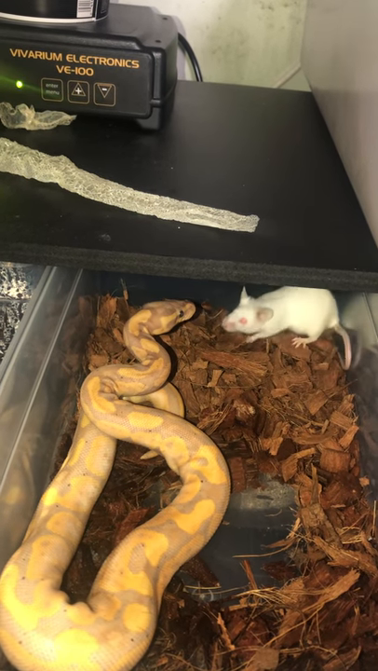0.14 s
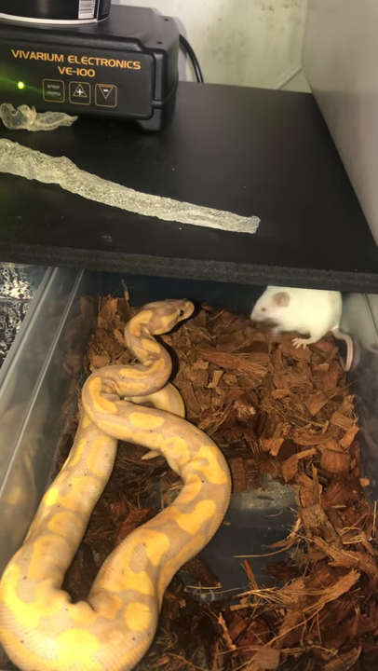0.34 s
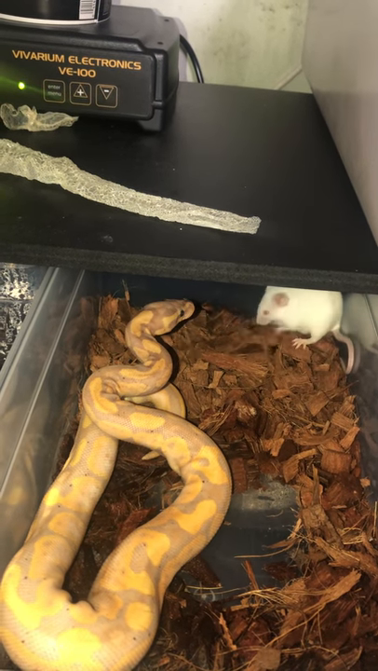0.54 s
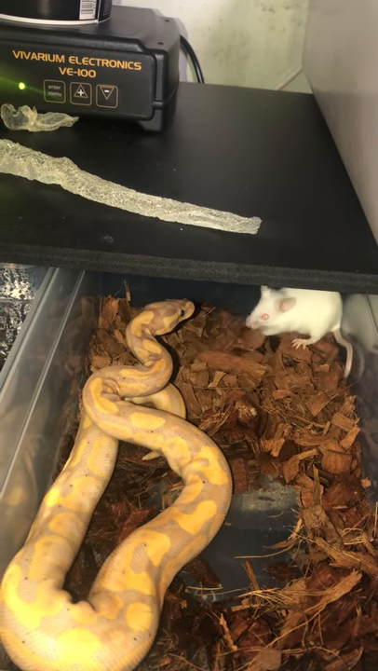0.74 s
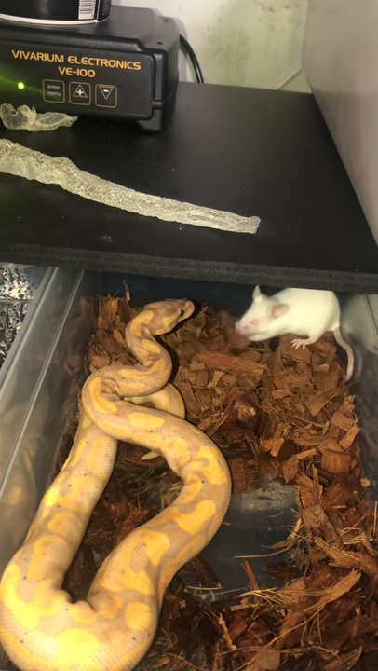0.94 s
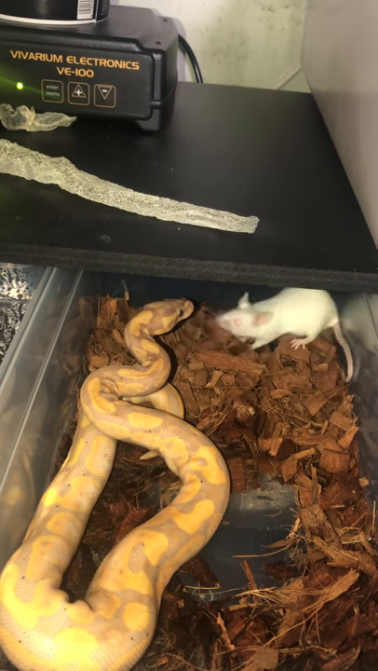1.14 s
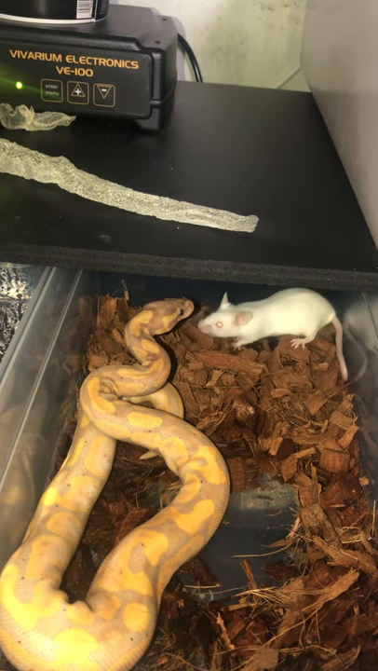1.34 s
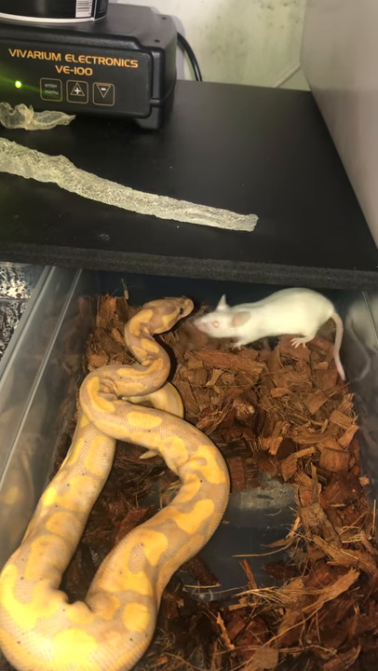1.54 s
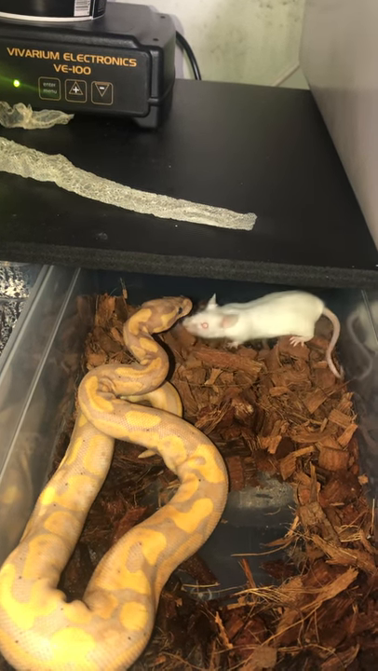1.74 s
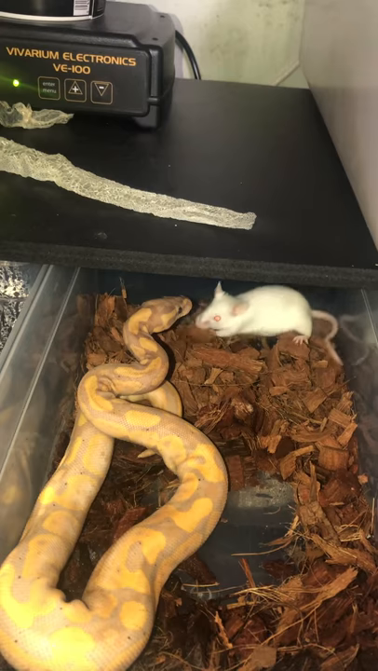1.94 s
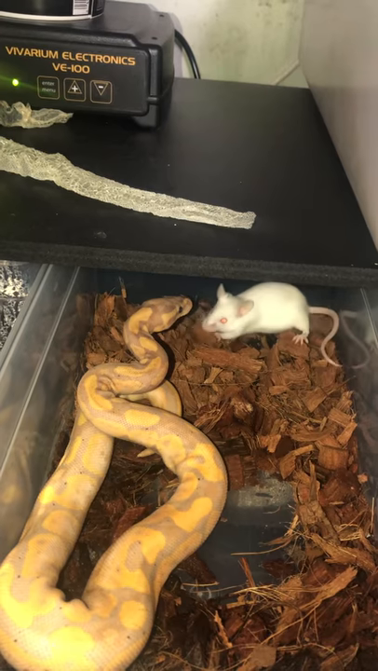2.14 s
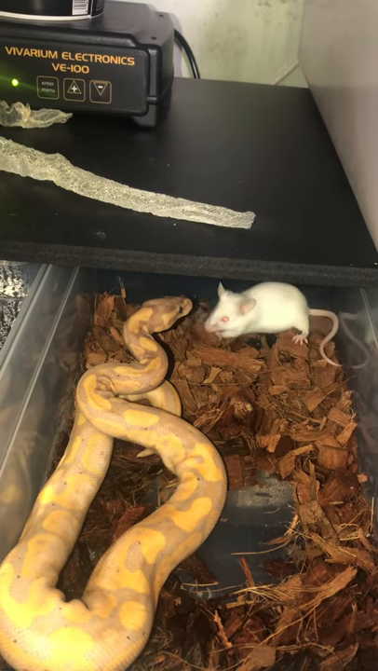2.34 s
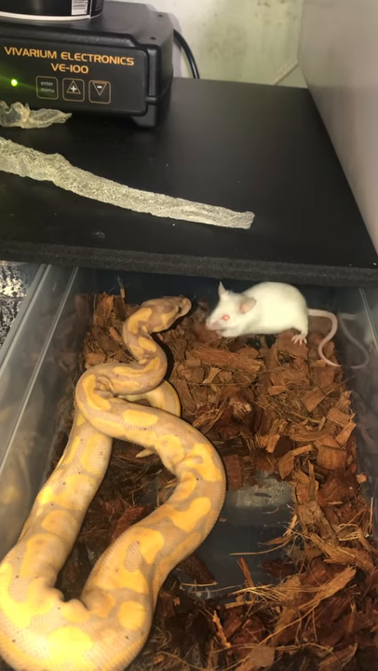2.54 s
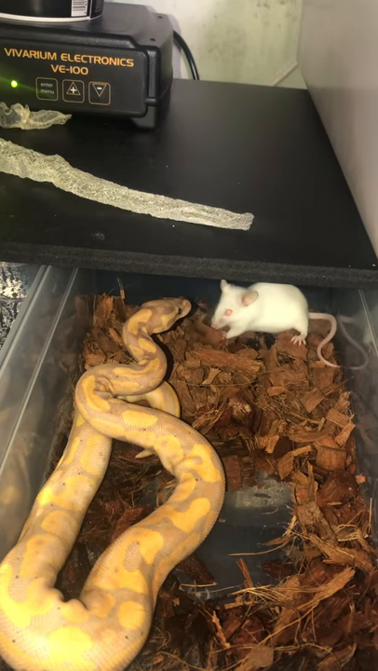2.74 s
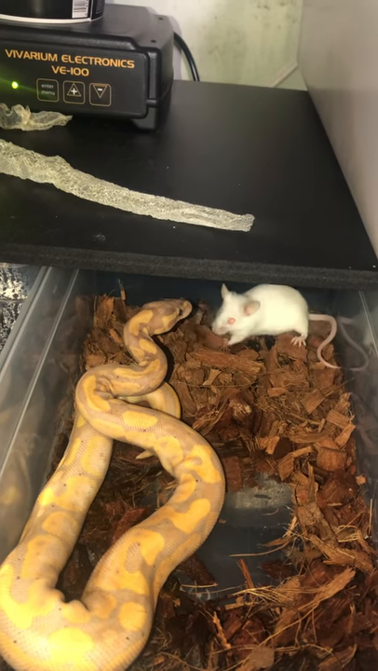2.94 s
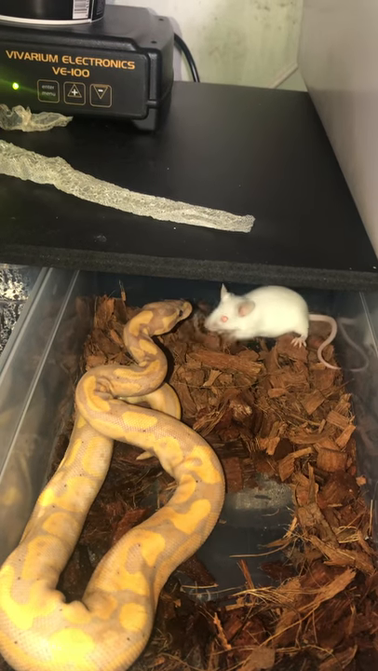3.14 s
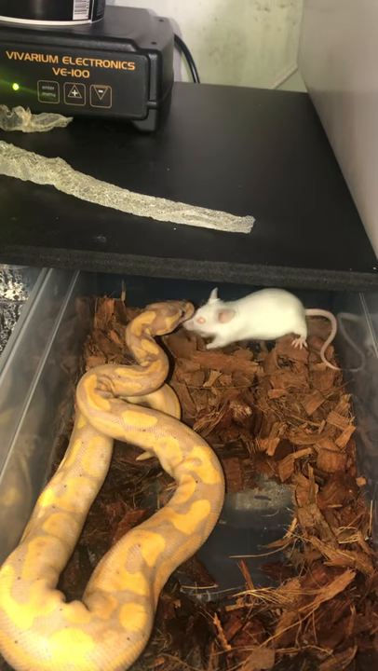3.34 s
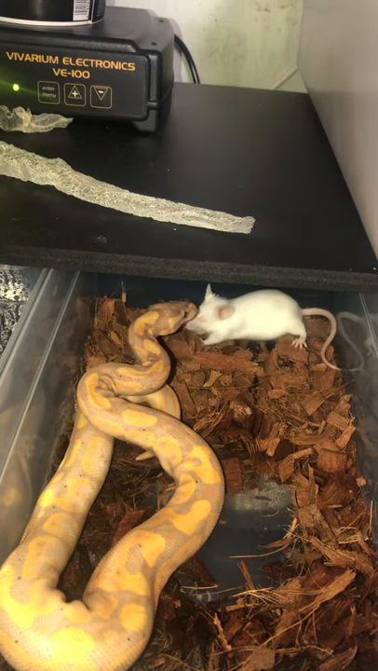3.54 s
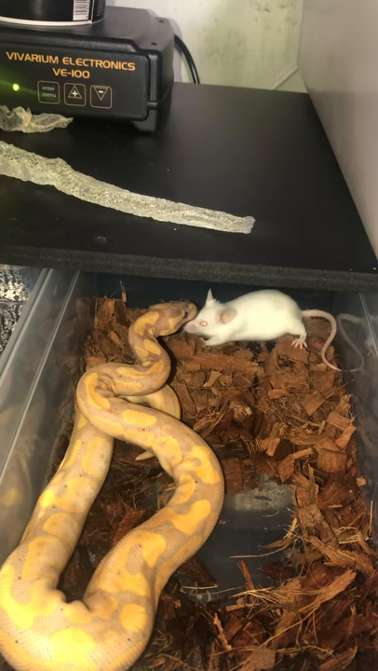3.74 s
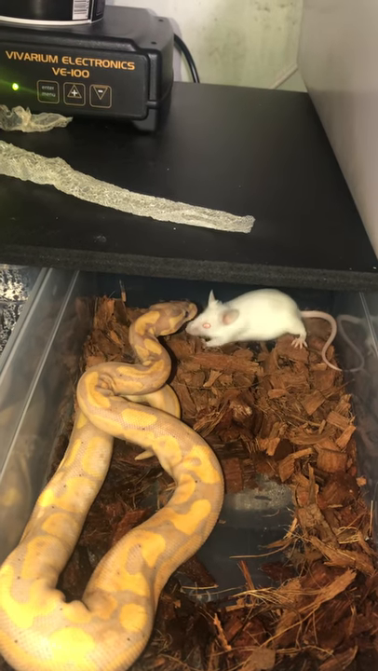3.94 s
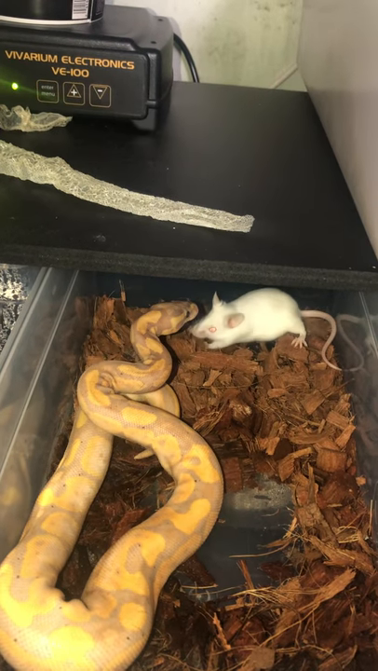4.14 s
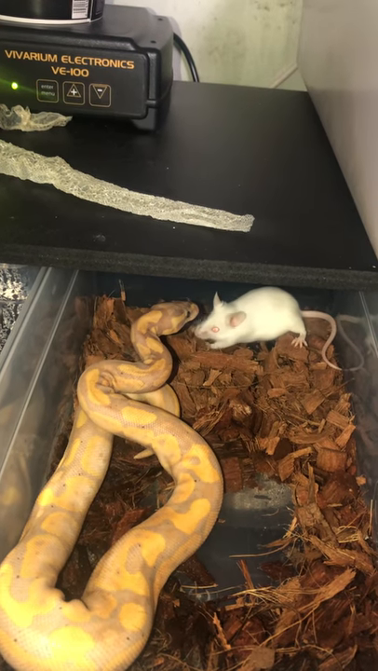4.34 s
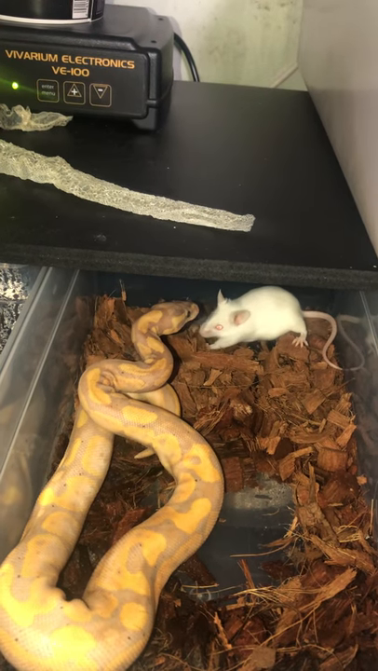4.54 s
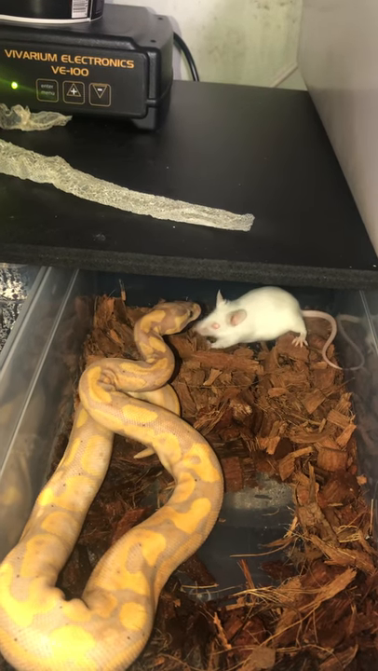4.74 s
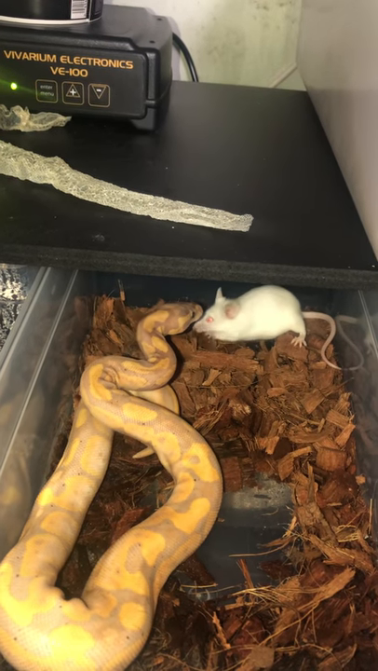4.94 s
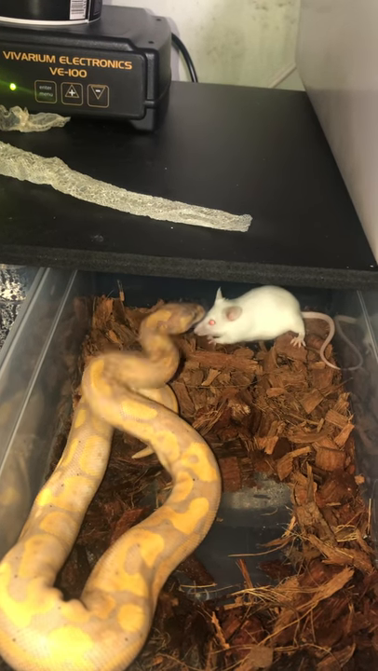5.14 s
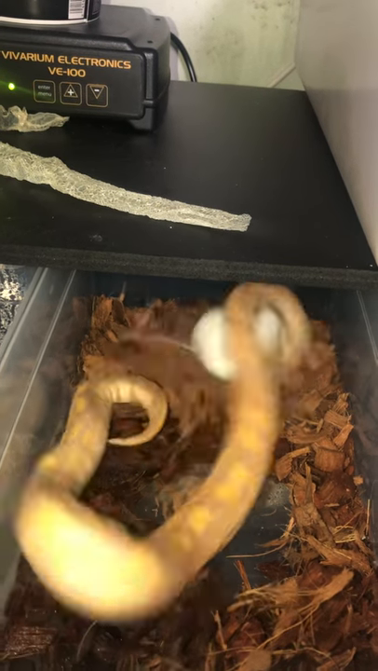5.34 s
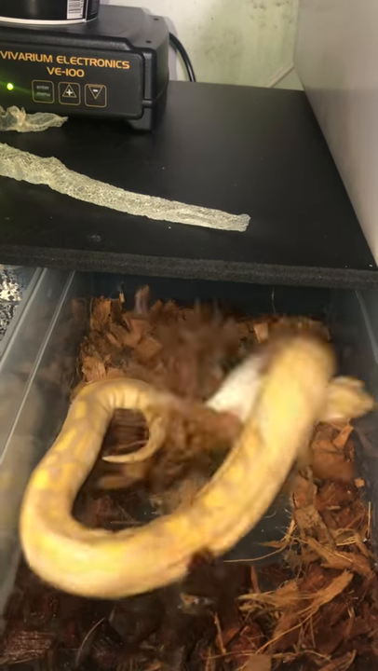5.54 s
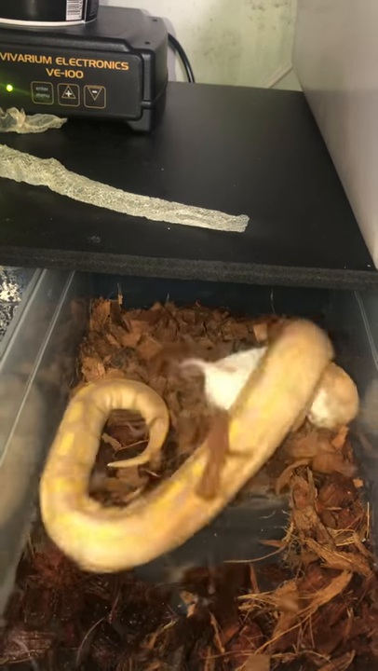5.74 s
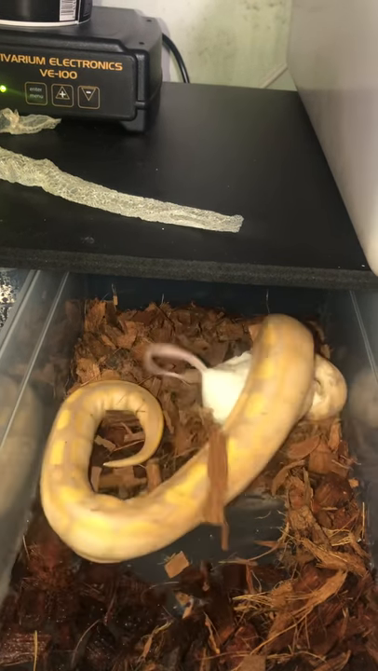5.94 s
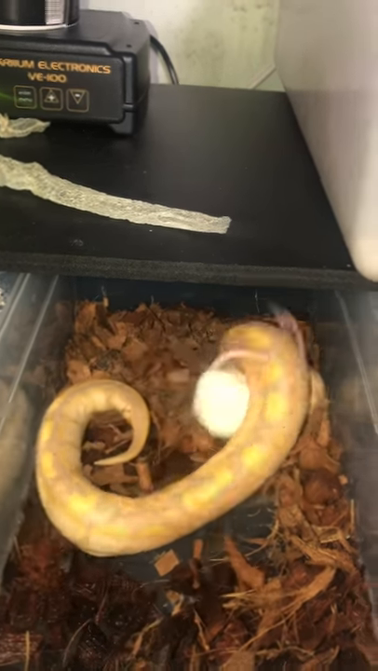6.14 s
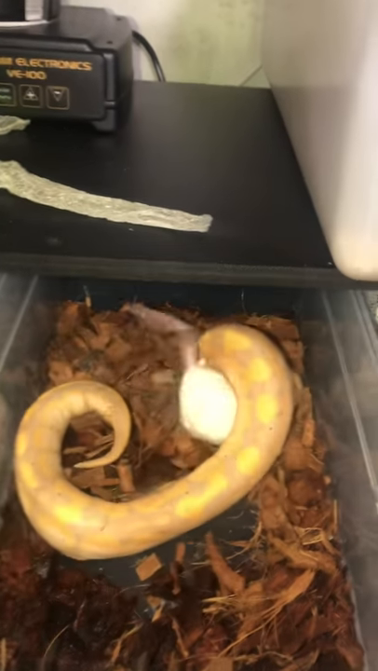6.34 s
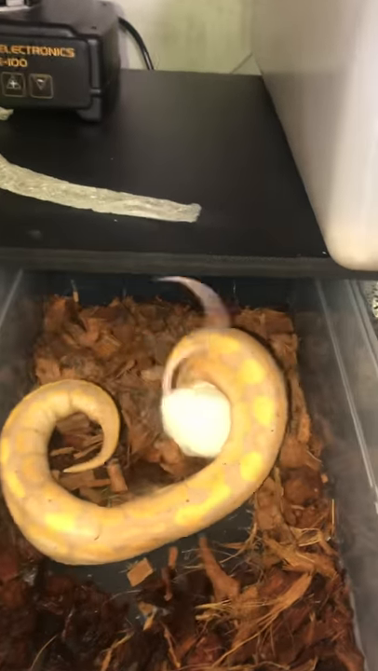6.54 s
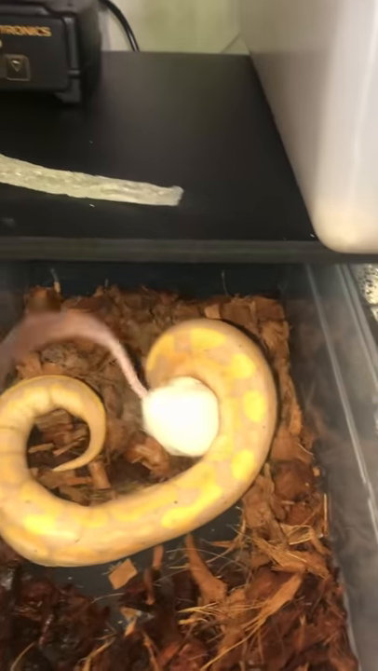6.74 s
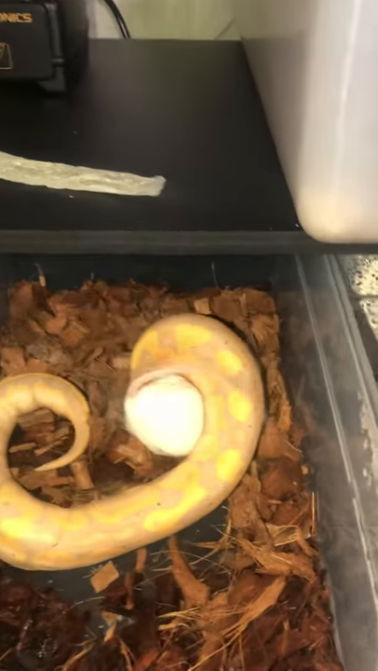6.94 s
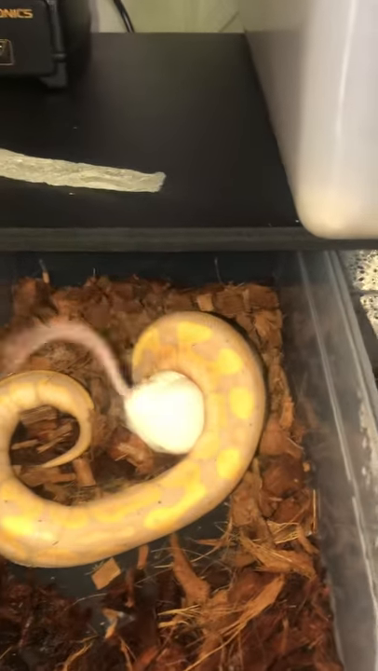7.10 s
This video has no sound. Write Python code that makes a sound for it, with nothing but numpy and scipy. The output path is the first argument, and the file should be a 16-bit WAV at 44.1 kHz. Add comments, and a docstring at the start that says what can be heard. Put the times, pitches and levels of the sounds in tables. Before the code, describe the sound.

Soft, grainy rustling of paws in dry bark chips, with tiny ticks, barely audible rubbing squeaks and a couple of sharp snaps, heard by one nearby microphone in a small quiet room. After a near pause, a snake's strike knocks the plastic tub with rapid low thuds and loud crackling. Coils then slide through the chips, swish along the wall and quieten.

```python
"""Dry bark chips rustle in a plastic tub: a mouse scratches about, then a snake strikes, thumps the tub
and drags its coils through them. Rustle is grainy noise, split into scrape, crisp husks and low drag.
Snaps are short noise bursts, thumps are down-swept sines, squeaks and a swish are resonant noise.
The walls answer with a short noise tail; a quiet room rumbles and hisses behind; one microphone."""
import sys
import numpy as np
from scipy import signal
from scipy.fft import rfft, irfft, next_fast_len
from scipy.io import wavfile
from scipy.ndimage import uniform_filter1d, map_coordinates

SR = 44100
rng = np.random.default_rng(int(sys.argv[2]) if len(sys.argv) > 2 else 0)


def generate_wav(signal):
    """Clip the signal to [-1, 1] and save it as 16-bit WAV at the path in sys.argv[1]."""
    frames = np.transpose(np.atleast_2d(signal))
    scaled = np.clip(frames, -1, 1) * 32767
    pcm = np.round(scaled).astype(np.int16)
    wavfile.write(sys.argv[1], SR, pcm)


N = 316175
T = np.arange(N) / SR  # time of each sample [s]


def amp(db):
    """Decibels to an amplitude factor."""
    return 10 ** (np.asarray(db) / 20)


def unit(x):
    """Scale to an rms of 1."""
    return x / np.sqrt(np.mean(x ** 2) + 1e-20)


def noise():
    """White noise as long as the scene."""
    return rng.standard_normal(N)


def along(points, hz):
    """Read a curve of (frequency [Hz], value) points on a log frequency axis."""
    f, v = np.transpose(points)
    return np.interp(np.log(hz + 1), np.log(f + 1), v)


def wobble(rate):
    """A smooth random curve, rate knots a second."""
    knots = rng.standard_normal(int(N * rate / SR) + 4)
    return map_coordinates(knots, [T * rate])


def filtered(x, response):
    """Filter x with a complex response of frequency."""
    m = next_fast_len(x.shape[-1] + 8192)
    spectrum = rfft(x, m) * response(np.fft.rfftfreq(m, 1 / SR))
    return irfft(spectrum, m)[..., :x.shape[-1]]


def resonance(f, hz, width):
    """One damped mode: passes its pitch at full level and falls off on both sides."""
    return 1j * f * width / (hz * hz - f * f + 1j * f * width)


# spectrum of the room tone: (frequency [Hz], relative density [dB per Hz])
ROOM = [(38, -33), (65, 1), (113, 0.5), (242, -15), (349, -14), (1130, -40), (1880, -32.5), (2310, -51.5),
        (2910, -41), (8790, -46.5), (12700, -68), (16000, -38)]
# wavering low hum: (frequency [Hz], width of one filter pass [Hz], starting level [dB], drift [dB per s])
HUM = [(41.1, 1.7, -54, -4), (54.9, 7.5, -56.5, -0.07)]
ROOM_DB = -57.5


def room():
    """Steady rumble and hiss as shaped noise, plus narrow noise bands that waver as low hum."""
    air = unit(filtered(noise(), lambda f: amp(along(ROOM, f))))
    out = amp(ROOM_DB) * air
    for hz, width, db, drift_db in HUM:
        band = filtered(noise(), lambda f: resonance(f, hz, width) ** 2)
        out = out + amp(db + drift_db * T) * unit(band)
    return out


# resonances of the tub: (frequency [Hz], width [Hz], level before the shared lift [dB])
TUB = [(1308, 146, -7), (1889, 107, -2.5), (2560, 44, -7), (2939, 76, -3.5), (3500, 80, -10),
       (4470, 40, -21), (6020, 73, -8)]
TUB_LIFT_DB = 3.5


def tub(f):
    """The open tub passes everything and lifts its own resonances."""
    modes = sum(amp(db) * resonance(f, hz, width) for hz, width, db in TUB)
    return 1 + amp(TUB_LIFT_DB) * modes


PATCH_DB = 1.8  # how far the colour of the crackle shifts in passing patches


def crackle(spectrum, rate, spread_db, grain_s, bed_db, lumps_db):
    """Short noise grains of scattered size over a bed of friction noise, coloured by the tub, rms 1."""
    hits = rng.random(N) < rate / SR  # rate is the mean number of grains a second
    sizes = hits * amp(spread_db * np.minimum(rng.exponential(size=N), 2))
    fade = np.exp(-np.arange(400) / (SR * grain_s))
    envelope = unit(signal.fftconvolve(sizes, fade)[:N]) + amp(bed_db)
    raw = envelope * amp(lumps_db * wobble(45)) * noise()
    # smooth random tilts over time and frequency keep the colour moving
    z = signal.stft(raw, nperseg=256)[2]
    across_pitch = uniform_filter1d(rng.standard_normal(z.shape), size=5, axis=0)
    patches = unit(uniform_filter1d(across_pitch, size=9, axis=1))
    raw = signal.istft(z * amp(PATCH_DB * patches), nperseg=256)[1][:N]
    return unit(filtered(raw, lambda f: amp(along(spectrum, f)) * tub(f)))


def stroke(s, length):
    """A swell from silence to 1 and back: starts 0.41 length before s and lasts 1.7 length in all."""
    u = np.clip((T - s) / length * 0.59 + 0.24, 0, 1)
    return np.sin(np.pi * u) ** 1.96


# steady settling and sliding of the chips: (time [s], scrape level [dB])
STIR = [(0, -81), (.6, -71.5), (2.1, -74.5), (3.4, -76), (4.6, -78.5), (5.22, -74.5), (5.28, -48),
        (5.58, -50), (5.74, -58), (5.95, -56), (6.2, -60.5), (6.43, -50.5), (6.58, -60.5), (6.8, -68.5),
        (7.17, -73)]
# single strokes of paws and coils through the chips:
# (time [s], nominal length [s], scrape level [dB], crisp husks re scrape [dB])
SCUFFS = [(0.041, 0.046, -62.5, -4.5), (0.274, 0.069, -66.5, -23), (0.404, 0.068, -62, -10),
          (0.513, 0.034, -65, -0.5), (0.598, .055, -61, -5), (0.676, .074, -55, -5),
          (0.803, 0.068, -66.5, 1.5), (0.977, 0.065, -62, 3.5), (1.154, 0.11, -66.5, 2),
          (1.223, 0.016, -65, 12.5), (1.259, 0.029, -63.5, 1.5), (1.355, 0.072, -67, 2),
          (1.582, 0.056, -64.5, 0.5), (1.716, 0.033, -67.5, 0), (1.786, 0.12, -78.5, 9.5),
          (1.914, 0.15, -61, -9), (2.27, 0.025, -65.5, 3), (2.314, .018, -74.5, 8), (2.438, 0.12, -73, 4),
          (2.637, 0.2, -81, 10), (2.848, 0.033, -70.5, -6), (2.95, 0.073, -73, 6), (3.198, 0.04, -72.5, 7),
          (3.261, 0.047, -60, 0.5), (3.311, 0.068, -64, -9), (3.46, 0.095, -70, -7),
          (3.617, 0.037, -67.5, -16), (3.77, 0.029, -70, -18), (3.824, .057, -67, -9),
          (3.967, 0.045, -63, -23), (4.062, 0.041, -65.5, -13), (4.192, 0.1, -72, -18),
          (4.369, 0.058, -68.5, -8), (4.741, .083, -70.5, -21), (4.89, 0.12, -68.5, -22),
          (5.107, 0.016, -57.5, -22), (5.263, 0.044, -43, -11), (5.293, 0.029, -50.5, -11),
          (5.325, 0.026, -38.5, -29), (5.369, 0.026, -40.5, -12), (5.399, 0.038, -36, -9),
          (5.424, 0.037, -41.5, -20), (5.514, 0.03, -41, -5), (5.538, 0.03, -46, -5),
          (5.6, 0.017, -37.5, -10), (5.639, 0.044, -45, -8), (5.686, 0.037, -49, -25),
          (5.763, 0.078, -57, -21), (6.054, 0.11, -65.5, 0), (6.354, 0.16, -57.5, 7.5),
          (6.599, 0.011, -51, -18), (6.665, 0.04, -57, -4), (6.916, 0.031, -61.5, -34),
          (6.995, 0.053, -69.5, -1)]
# colours of chip on chip, crushed dry husks, and drag on the tub floor before the tub resonances:
# (frequency [Hz], relative density [dB per Hz])
SCRAPE = [(500, -11), (900, -4.5), (2000, -1.5), (4000, -6), (7000, -12.5), (16000, -43)]
HUSKS = [(3000, -17), (6000, -5), (9000, -1.5), (13000, -0.5), (16000, -4.5)]
DRAG = [(70, -17), (140, -2.5), (350, -3.5), (600, -4.5), (900, -9.5), (1600, -32)]
STIR_CRISP_DB, STIR_DRAG_DB = -1.5, 5.5  # husks and drag re scrape at the gentlest stir
CRISP_SLOPE, DRAG_SLOPE = -0.23, -0.36  # dB per dB: heavier stirring is mostly scrape
SCUFF_DRAG_DB = 5  # drag re scrape in a stroke


def rustle():
    """Paws and coils scrape chips, crush husks and drag on the floor; sliding is smoother than strokes."""
    scrape_db = np.interp(T, *np.transpose(STIR))
    effort_db = scrape_db - scrape_db.min()
    crisp_db = scrape_db + STIR_CRISP_DB + CRISP_SLOPE * effort_db
    drag_db = scrape_db + STIR_DRAG_DB + DRAG_SLOPE * effort_db
    # power of scrape, husks and drag; the steady scrape is the separate, smoother slide
    power = np.vstack([0 * T, amp(2 * crisp_db), amp(2 * drag_db)])
    for s, length, db, crisp in SCUFFS:
        levels = amp(db + np.array([[0], [crisp], [SCUFF_DRAG_DB]]))
        power = power + (levels * stroke(s, length)) ** 2
    slide = crackle(SCRAPE, rate=140, spread_db=4, grain_s=.002, bed_db=7, lumps_db=2)
    scrape = crackle(SCRAPE, rate=140, spread_db=5, grain_s=.002, bed_db=1.5, lumps_db=2.5)
    husks = crackle(HUSKS, rate=120, spread_db=5, grain_s=.0012, bed_db=3, lumps_db=1.5)
    drag = crackle(DRAG, rate=150, spread_db=3, grain_s=.004, bed_db=3, lumps_db=1.5)
    strokes = np.sum(np.sqrt(power) * [scrape, husks, drag], axis=0)
    return amp(scrape_db) * slide + strokes


# decay of the room's answer: (frequency [Hz], t60 [s])
WALLS = [(200, 0.37), (2000, 0.098), (10000, 0.091)]


def walls(x):
    """The room answers with a noise tail in which each frequency dies at its own speed."""
    hz, t, z = signal.stft(rng.standard_normal(SR // 4), SR, nperseg=256)
    decay = amp(-60 * t / along(WALLS, hz)[:, None])
    tail = signal.istft(z * decay, SR, nperseg=256)[1]
    late = np.pad(x, (130, 0))  # the answer starts 130 samples after the sound
    return signal.fftconvolve(late, tail / np.linalg.norm(tail))[:N]


# faint squeaks of rubbing:
# (time [s], nominal length [s], frequency [Hz], width of one filter pass [Hz], level [dB])
SQUEAKS = [(0.283, 0.056, 4500, 500, -69.5), (.285, 0.037, 6000, 700, -70), (2.566, 0.035, 5500, 500, -73),
           (2.575, 0.058, 4430, 700, -68), (2.598, 0.055, 2820, 250, -76), (3.045, 0.085, 3120, 250, -79),
           (1.783, 0.042, 10600, 2500, -71)]


def squeaks():
    """Rubbing excites resonant bands, sometimes several together: resonant noise in short swells."""
    out = np.zeros(N)
    for s, length, hz, width, db in SQUEAKS:
        band = filtered(noise(), lambda f: resonance(f, hz, width) ** 2)
        out += amp(db) * stroke(s, length) * unit(band)
    return out


# single chips that snap or hit the wall, before the tub resonances:
# (time [s], peak level of the body [dB], pitch [Hz], fizz peak re body peak [dB])
SNAPS = [(.411, -53, 3520, -15), (.429, -42.5, 1530, -5), (0.613, -43, 1930, -17),
         (0.799, -45.5, 1760, -22), (1.026, -49.5, 1630, -19), (1.106, -47, 9400, -7),
         (1.2648, -50, 1860, -13), (1.332, -52, 1900, 1), (1.9598, -44.5, 1830, -20),
         (1.9804, -46, 1840, -18), (2.157, -53, 6140, -6), (2.1982, -27, 8600, -20),
         (2.3032, -37.5, 8240, -9), (2.465, -51, 2670, -10), (2.4943, -24, 9600, -29),
         (3.3308, -49, 1780, -14), (3.8622, -47.5, 1910, -8), (4.498, -43, 1510, -7.5),
         (4.7275, -55.5, 1500, -16), (4.78, -47, 4500, 0), (4.786, -49, 2980, -3), (5.112, -51, 1930, -2),
         (5.2687, -41, 2960, -8), (5.2989, -24, 1960, -32), (5.3368, -24, 2090, -9),
         (5.3686, -33, 3350, -20), (5.3796, -26.5, 2990, -22), (5.418, -22.5, 1700, -28),
         (5.444, -34, 2060, -8), (5.455, -32, 1790, -2.5), (5.4966, -17, 2080, -26),
         (5.5355, -19, 1650, -23), (5.5672, -28, 2960, -10), (5.598, -33, 1610, -6),
         (5.697, -36, 1800, -21), (5.7591, -35, 1960, -27), (5.9086, -46.5, 1920, -14),
         (5.939, -36.5, 2680, -21), (5.968, -42, 1830, -15), (6.0994, -38, 1910, 1),
         (6.318, -31.5, 3100, 1), (6.5989, -41.5, 1900, -16), (6.6744, -39.5, 1970, 1),
         (6.6942, -42, 1950, -13), (6.789, -46.5, 2170, -13), (6.8843, -57, 2460, -16),
         (6.999, -47, 2980, -24), (7.1513, -54, 2260, -21)]
FIZZ_HZ = 9500
KNOCK_HZ, KNOCK_DB = 700, 2  # knock on the tub wall: pitch, peak re body for a chip of that same pitch


def snaps():
    """A sharp noise crack that dies at once: a pitched chip body, a dry fizz and a knock on the tub wall."""
    out, t = np.zeros(N + 3000), np.arange(3000) / SR
    for s, db, hz, fizz_db in SNAPS:
        rise = 1 - np.exp(-t * hz / 1.36)  # small bright chips break more suddenly
        fall = amp(-60 * t / 0.013) + amp(2.5 - 60 * t * hz / 14)
        burst = rise * fall * rng.standard_normal((3, len(t)))
        body = filtered(burst[0], lambda f: resonance(f, hz, 0.49 * hz) * resonance(f, 0.5 * hz, 4.2 * hz))
        fizz = filtered(burst[1], lambda f: resonance(f, FIZZ_HZ, 24000) ** 2)
        knock = filtered(burst[2], lambda f: resonance(f, KNOCK_HZ, 570) ** 2)
        body, fizz, knock = [part / np.abs(part).max() for part in (body, fizz, knock)]
        knock_level = amp(KNOCK_DB) * (KNOCK_HZ / hz) ** 2  # small bright chips knock less
        snap = body + amp(fizz_db) * fizz + knock_level * knock
        out[round(s * SR):][:len(t)] += amp(db) * snap
    return filtered(out[:N], tub)


# body blows on the tub, before the bass loss:
# (time [s], peak of the swell [dB], pitch it settles to [Hz], cycles of that pitch in a 60 dB decay)
THUMPS = [(.425, -44.5, 155, 2.9), (.712, -42, 284, 6), (.772, -46, 500, 7.5), (3.861, -37, 179, 5.8),
          (4.4983, -32.5, 268, 4.9), (4.727, -46.5, 197, 10.5), (5.267, -27.5, 178, 8),
          (5.333, -22, 375, 7.8), (5.341, -15.5, 111, 5.6), (5.378, -26.5, 145, 9), (5.412, -26, 398, 9),
          (5.435, -24, 100, 8), (5.451, -30, 112.5, 12), (5.531, -27.5, 445, 13), (5.604, -19.5, 339, 12.8),
          (5.609, -17.5, 154, 18.7), (6.0998, -35.5, 250, 7), (6.6, -44, 400, 9.2), (6.672, -46.5, 194, 6),
          (6.912, -40, 208, 12)]
SWEEP_CYCLES, SWEEP_S = 1500 * 0.001717, 0.0013  # extra cycles in the sweep, its time constant


def thumps():
    """Bending waves in plastic: high ripples arrive first, so each blow sweeps down into a low swing."""
    out, t = np.zeros(N + 8000), np.arange(8000) / SR
    for s, db, hz, cycles in THUMPS:
        t60 = cycles / hz
        turns = hz * t + SWEEP_CYCLES * (1 - np.exp(-t / SWEEP_S))
        phase = 2 * np.pi * turns + rng.uniform(0, 2 * np.pi)
        swell = (1 - np.exp(-t / 0.0022)) ** 2.66 * amp(-60 * t / t60)
        out[round(s * SR):][:len(t)] += amp(db) * swell / swell.max() * np.sin(phase)
    # the tub is too small to send out deep bass
    return filtered(out[:N], lambda f: 1 / (1 + 75 / (1j * f + 1)) ** 2)


# high resonances of the wall: (frequency [Hz], width of one filter pass [Hz], relative level [dB])
SWISH = [(4200, 700, 1), (4840, 1700, 5.5), (5550, 750, 2), (6200, 580, 5.5)]
SWISH_S, SWISH_LENGTH_S, SWISH_DB = 6.365, 0.16, -48.5  # time, nominal length, level


def swish():
    """A coil swishes along the wall: even friction noise in the wall's high resonances."""
    rub = filtered(noise(), lambda f: sum(amp(db) * resonance(f, hz, w) ** 2 for hz, w, db in SWISH))
    return amp(SWISH_DB) * stroke(SWISH_S, SWISH_LENGTH_S) * unit(rub)


def scene():
    """All moves in the tub with the walls' answer, over the room, alike in both channels."""
    moves = rustle() + squeaks() + snaps() + thumps() + swish()
    mono = room() + moves + amp(-14.5) * walls(moves)
    return np.tile(mono, (2, 1))


TOP_HZ = 16050


def record(dry):
    """The microphone drops the deepest bass and keeps nothing above its band limit."""
    return filtered(dry, lambda f: (f < TOP_HZ) / (1 + (33 / (f + 1)) ** 8))


dry = scene()
out = record(dry)
generate_wav(out)
```